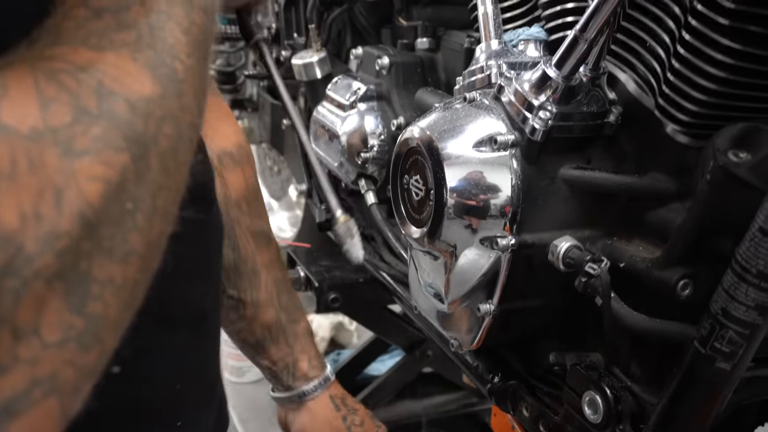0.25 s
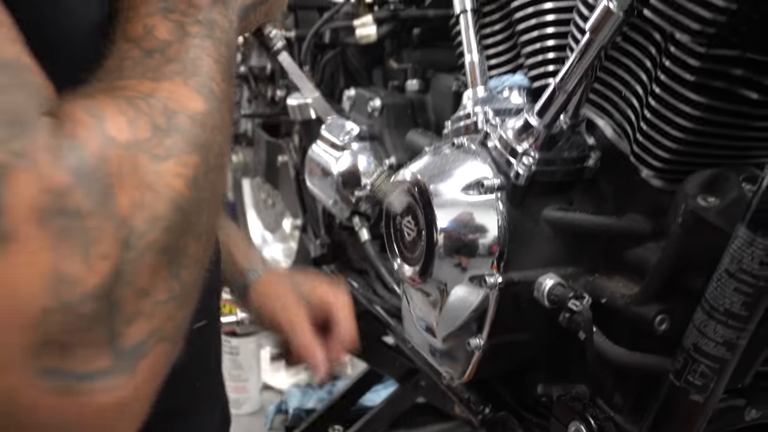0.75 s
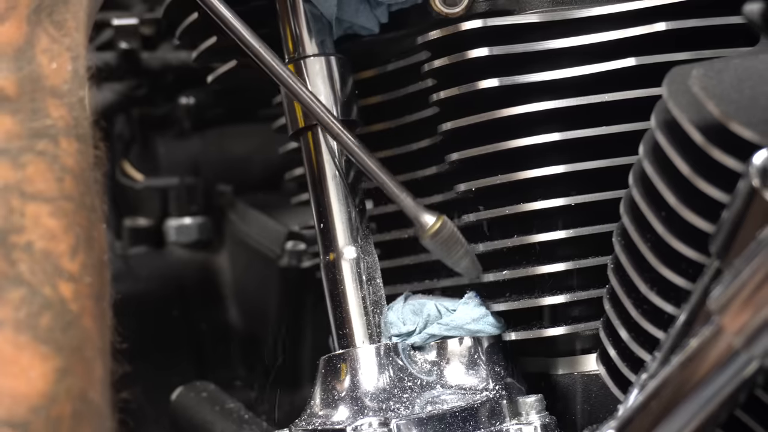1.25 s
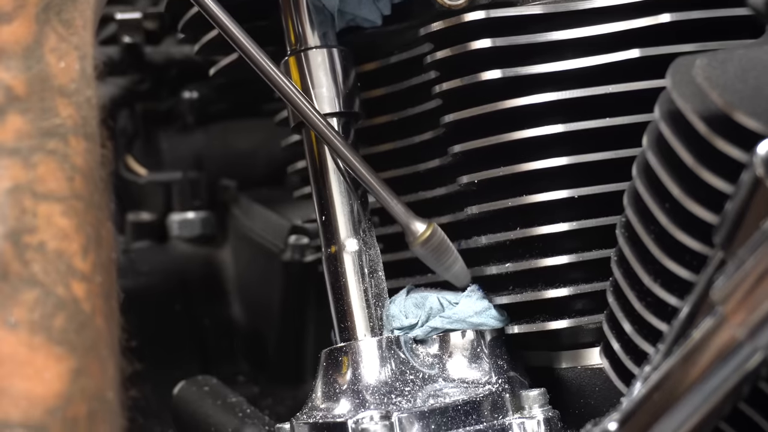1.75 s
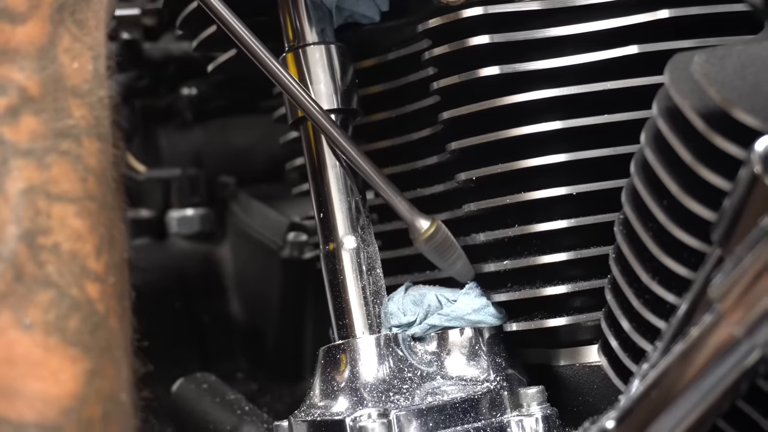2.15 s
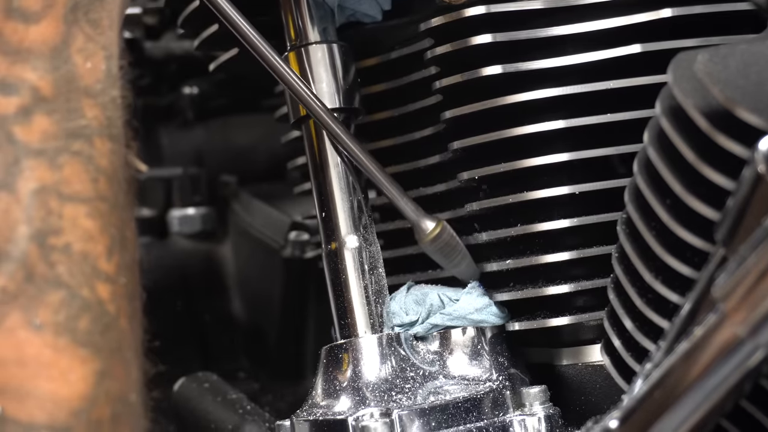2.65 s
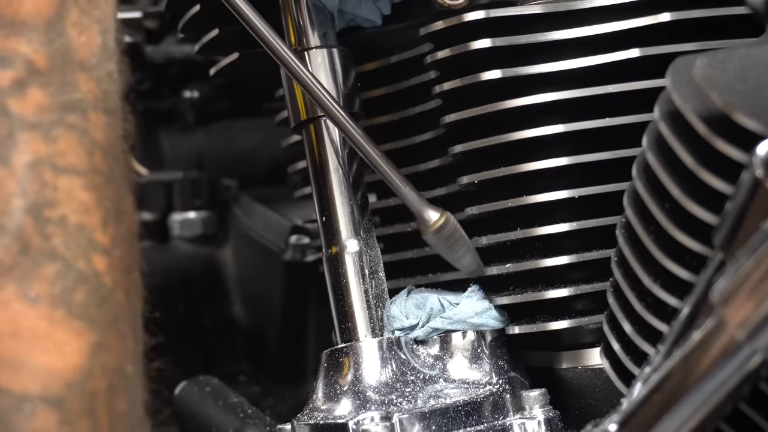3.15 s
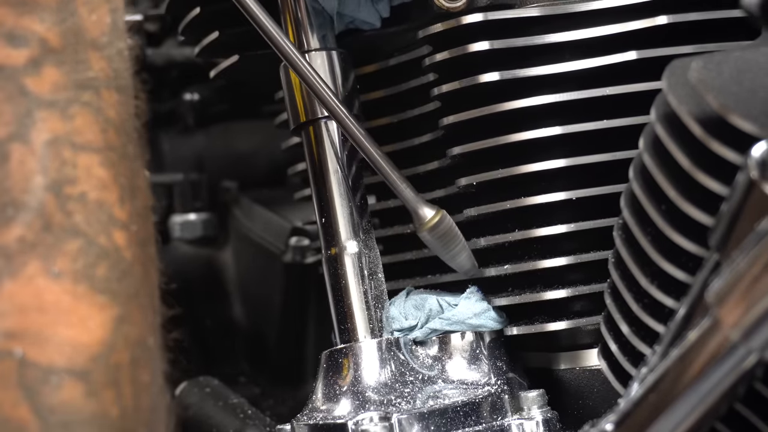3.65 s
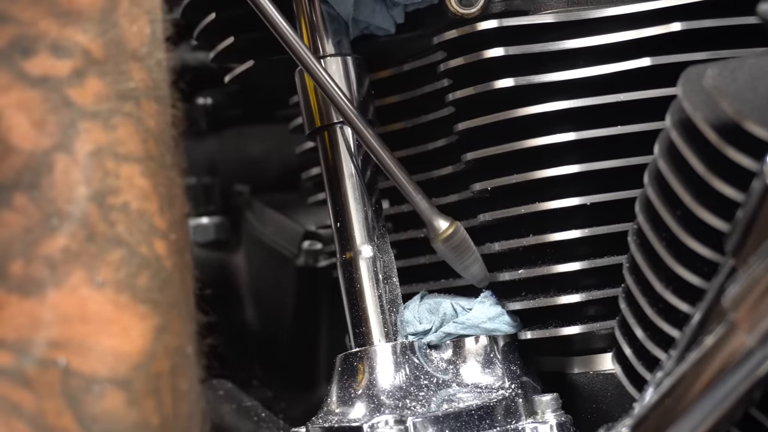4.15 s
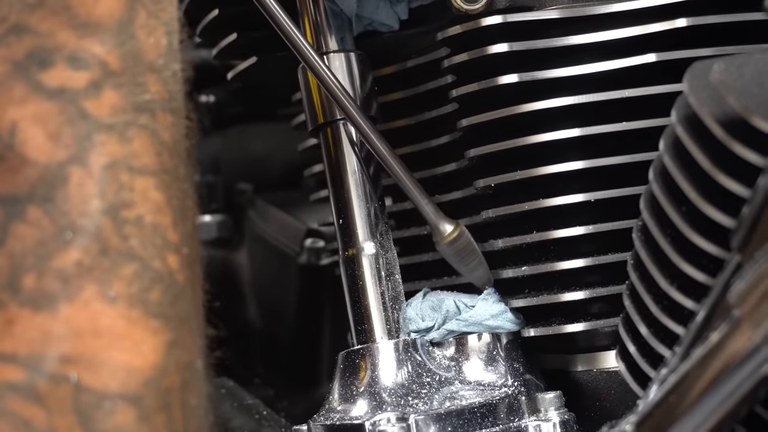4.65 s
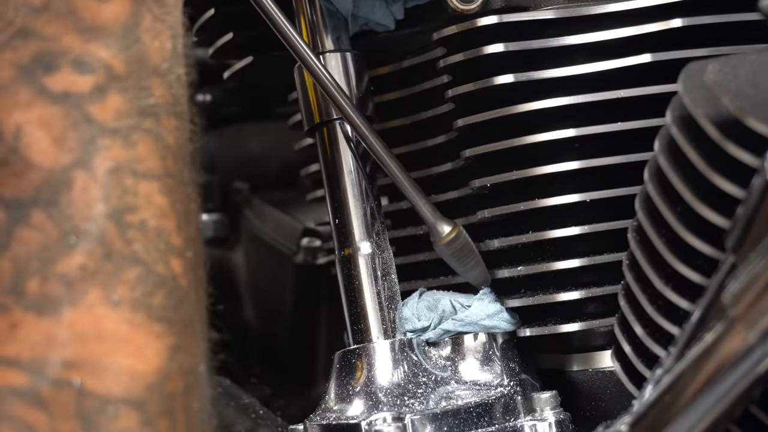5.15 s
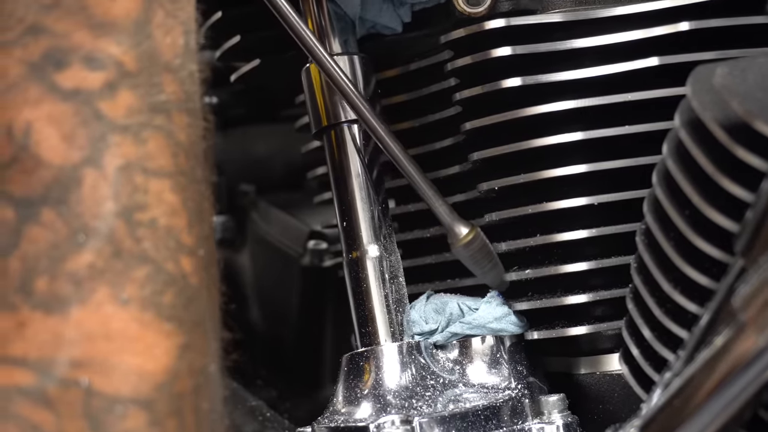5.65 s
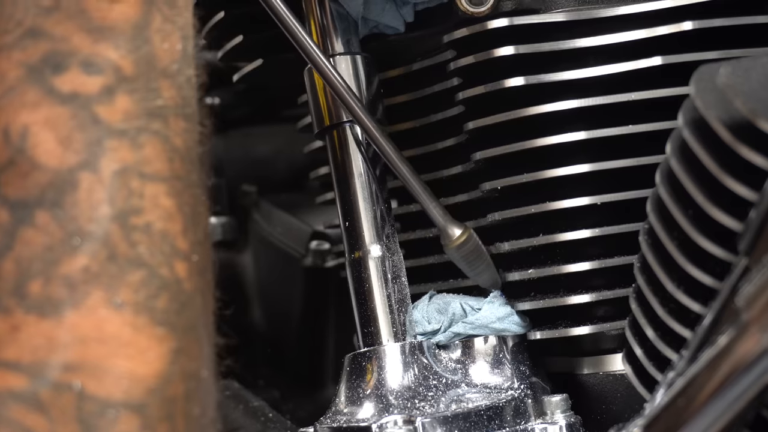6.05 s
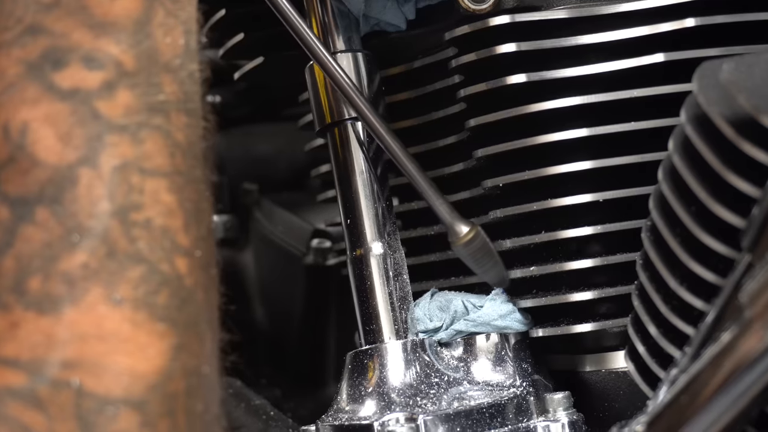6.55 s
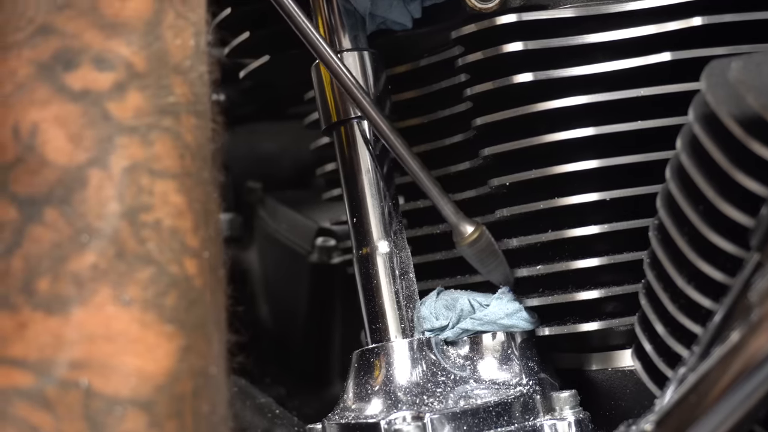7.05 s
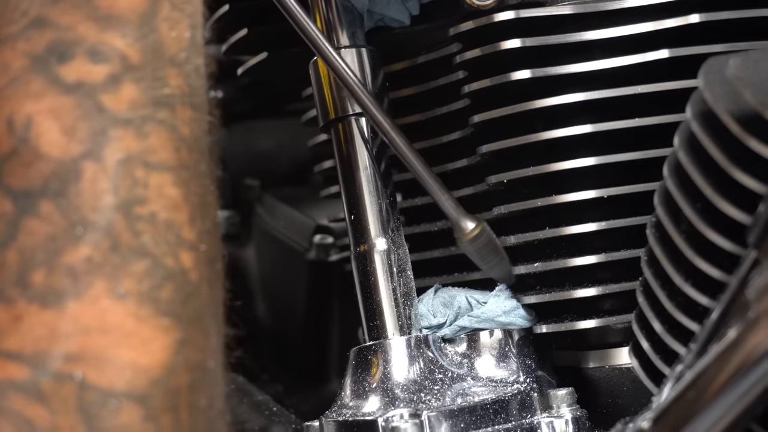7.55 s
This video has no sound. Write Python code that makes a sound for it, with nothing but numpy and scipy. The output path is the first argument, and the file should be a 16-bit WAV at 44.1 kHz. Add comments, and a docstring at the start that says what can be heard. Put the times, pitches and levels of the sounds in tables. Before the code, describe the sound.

Close and dry: a fluttering compressor drone comes first, with a soft tap, then swells just before a dull kick and air burst. An air die grinder whoops upward in a fraction of a second, dips slightly and holds a piercing whine, coloured by thin bearing tones and hiss. It runs free for several seconds, then cuts metal in two spells, adding a gritty rasp and very high brief squeaks until the end.

```python
"""An air die grinder runs up, overshoots, settles on its governor and works an engine cylinder with a burr.
One shaft speed drives the tool: sines for vanes, rotor and bearings, and shaped noise for the exhaust hiss.
Later the burr rasps and squeals: noise of chips excites resonances of the cylinder wall and the burr's shank.
Light knocks are short resonant bursts; behind them a piston compressor throbs in stroke harmonics and noise.
One close microphone."""
import sys
import numpy as np
from scipy import signal
from scipy.fft import rfft, irfft
from scipy.io import wavfile
from scipy.ndimage import uniform_filter1d

SR = 44100
rng = np.random.default_rng(int(sys.argv[2]) if len(sys.argv) > 2 else 0)


def wav_record(signal):
    """Record a signal, one row per channel, as 16-bit PCM in the file named by sys.argv[1]."""
    frames = np.transpose(np.atleast_2d(signal))
    bounded = np.clip(frames, -1, 1)
    # unit amplitude maps onto the largest positive 16-bit level
    quanta = np.round(bounded * 32767).astype(np.int16)
    wavfile.write(sys.argv[1], SR, quanta)


N = 343980
TIME = np.arange(N) / SR
FREQS = np.arange(N // 2 + 1) * SR / N

# governed speed, drifting a little while it runs: (time [s], vane-pass rate [Hz])
GOVERNED_SPEED = [(1.3, 2196), (1.73, 2188), (2.77, 2188), (2.93, 2212), (4.86, 2215), (5.59, 2209),
                  (5.98, 2226), (6.5, 2192), (7.09, 2214), (7.72, 2204)]
# strength of the vane whine before run-up losses and waver: (time [s], level [dB])
WHINE_LEVEL = [(1.3, -13), (1.46, -12.5), (2.15, -13), (2.31, -12.5), (3.53, -14), (3.81, -12.5),
               (4.85, -13), (5.55, -15.5), (7.04, -16.5), (7.2, -16.5), (7.29, -18), (7.8, -17.5)]
# resonances of the exhaust port in the run-up: (frequency [Hz], relative level [dB])
PORT_SPECTRUM = [(200, -7), (480, -11), (820, 1), (1250, -5), (1750, -10), (2650, 1), (3600, -13),
                 (4550, -5), (5500, -14), (6500, -9)]
# flow of exhaust air: (time [s], relative level [dB])
AIR_FLOW = [(1.32, -35), (2.17, -32.5), (2.4, -33), (2.71, -30), (2.87, -34), (4.17, -33.5), (5.2, -36.5),
            (5.47, -35.5), (5.88, -40.5), (6.41, -35.5), (7.8, -37.5)]
# colour of the exhaust air: (frequency [Hz], relative spectral level [dB])
EXHAUST_SPECTRUM = [(200, -57), (700, -3.5), (1300, -2.5), (2000, 1), (2700, 0), (4000, 0), (5100, 5.5),
                    (6400, -0.5), (7400, -4), (8800, 0), (10200, -8), (12800, -14.5), (15700, -16.5)]
# the hand shifts on the tool: (time [s], grip [0 = first, 1 = second])
HAND_GRIP = [(2.7, 0.071), (3.0, 1)]
# rotor and bearing lines while the tool runs:
# (multiple of shaft speed, level in first grip [dB], level in second grip [dB])
SHAFT_LINES = [(3, -25.5, -26.9), (3.552, -40.8, -44.6), (5, -39.1, -36.8), (7, -38.0, -41.0),
               (9, -30.5, -32), (10, -42.3, -41.0), (10.28, -39.1, -48.2), (11, -38.0, -37.5),
               (12, -38.7, -36.4), (13.01, -37.8, -35.3), (13.395, -33.5, -31), (14, -31.7, -31.5),
               (14.565, -38.7, -43.3), (15, -36.1, -32.9), (18, -42.5, -36.7), (18.11, -36.0, -35.8),
               (20.92, -41.7, -50.8), (21, -36.8, -48.4), (23.81, -40.0, -48.7), (24.19, -36.5, -35.5),
               (24.47, -40.2, -39.5)]
# three bearing tones that sing out: (name, base level [dB])
SINGING_TONES = [("low", -38), ("middle", -35), ("high", -41.5)]
# their places in the same sequence: (multiple of shaft speed for each tone)
SINGING_MULTIPLES = (13.815, 17.367, 31.56)
# one bearing tone swells or fades for a moment: (middle [s], length [s], change [dB], tone name)
TONE_SWELLS = [(1.31, 0.22, 10.5, "middle"), (1.52, .15, -13, "middle"), (1.61, 0.47, 11.5, "high"),
               (2.12, 0.31, 8, "middle"), (2.153, .7, 5, "high"), (2.81, .17, 12, "high"),
               (2.92, .3, -16, "middle"), (2.98, 0.46, 9, "low"), (3.22, 0.33, 10, "high"),
               (3.55, 0.46, 7, "low"), (4.27, 0.22, 7, "high"), (4.503, 3.6, 13.5, "low"),
               (4.72, 0.7, 7, "middle"), (6.7, 0.69, 5.5, "high"), (7.07, 0.43, 10.5, "middle"),
               (7.45, .12, 9, "high")]
# the burr is pressed on the wall: (start [s], length [s], rasp level [dB])
WALL_CUTS = [(5.115, .69, -30.5), (6.06, 1.8, -27)]
# hard bites that make the shank squeal: (start [s], length [s], relative level [dB])
HARD_BITES = [(5.46, 0.12, -36), (5.608, 0.057, -31), (5.746, 0.041, -34), (6.573, .125, -31),
              (6.78, 0.19, -33.5), (7.132, 0.026, -27), (7.204, 0.037, -27), (7.259, 0.047, -23),
              (7.623, .085, -30.5)]
# ringing of the burr's shank: (frequency [Hz], bandwidth [Hz], relative level [dB])
SHANK_MODES = [(7975, 16, 0), (12580, 70, -20), (14740, 110, -19)]
# cylinder wall under the burr: (frequency [Hz], bandwidth [Hz], relative level [dB])
WALL_MODES = [(1700, 74, -7), (3450, 230, -0.5), (5000, 210, -2), (6570, 87, 0), (9020, 140, -8)]
# knocks of handling, and the kick as the throttle opens: (time [s], level [dB], frequency [Hz], 60 dB decay [s])
KNOCK_EVENTS = [(.37, -36, 85, .2), (.508, -29, 1400, .12), (1.073, -16.5, 300, .1), (3.39, -34, 190, .35)]
# compressor strokes: (harmonic number, relative level at first [dB], level once the tool runs [dB])
STROKE_HARMONICS = [(1, -48, -56), (2, -48, -54), (3, -54, -59), (8, -40.5, -48.5), (9, -47, -51),
                    (11, -42, -49), (12, -43, -54), (13, -43, -44.5), (15, -40, -59), (16, -47.5, -51),
                    (17, -50, -44), (18, -37, -42), (19, -44, -48.5), (20, -44, -55), (21, -38.5, -42),
                    (22, -38, -41.5), (23, -35.5, -47), (24, -41.5, -51), (25, -49, -43.5),
                    (29, -48, -45.5), (31, -42, -47.5), (32, -59, -48.5), (33, -44, -56)]
# compressor motor: (frequency [Hz], level at first [dB], level once the tool runs [dB], waver [dB])
MOTOR_TONES = [(120, -46, -50, 1), (858.7, -34.5, -49, 1.5)]
# background level: steps up, then drops as the grinder starts: (time [s], relative level [dB])
BACKGROUND_LEVEL = [(0, -.5), (.883, .5), (.889, 8), (1.07, 9), (1.16, 6.5), (1.23, -8), (1.3, -6),
                    (7.8, -5)]
# colour of the workshop noise: (frequency [Hz], relative spectral level [dB])
WORKSHOP_SPECTRUM = [(25, -3), (100, -12.5), (180, -6.5), (350, -11), (520, -3.5), (620, -6), (800, -4),
                     (1000, -4), (1220, 0), (1900, -9.5), (3500, -6.5), (5000, -12.5), (8500, -15),
                     (11500, -32), (15500, -43)]

VANE_COUNT = 6
# the throttle is cracked, then opened fully; the rotor overshoots until the governor shuts [s]
THROTTLE_S, FULL_THROTTLE_S, GOVERNOR_S = 1.070, 1.190, 1.233
# vane passes per second at the first kick and running free; their rise at part throttle
KICK_HZ, FREE_HZ, PART_HZ_PER_S = 300, 2790, 9400
# time constants of the leap and of the settling
LEAP_S, SETTLE_S = .019, .015
# the governor hunts: rms share of the speed, and changes per second
HUNT_SHARE, HUNT_PER_S = 0.000698, 25
# the whine wavers as the tool moves: rms waver, and changes per second
WAVER_DB, WAVER_PER_S = 0.23, 20
# losses as the air pressure runs down at part throttle, and as the shutting governor chokes the whine
STARVE_DB, CHOKE_DB, CHOKE_S = 3, 15, .011
# until the rotor settles the whine takes a share of the port's colour, and a lift
PORT_SHARE, SURGE_DB = 0.58, 1
# change in hiss from spare air at part and full throttle, and the first puff
PART_AIR_DB, FULL_AIR_DB, PUFF_DB, PUFF_S = -1.5, 10.5, 4, 0.041
# the rotor and bearing lines take this share of the whine's level swings in dB
ROTOR_FOLLOWS = 0.27
SQUEAL_ATTACK_S, SQUEAL_RELEASE_S, CUT_FADE_S = .007, 0.027, 0.038
PUMP_HZ = 23.208
CUTOFF_HZ = 15750


def vane_speed():
    """Rotor inertia: a steady rise at part throttle, then exponential approaches to free and governed speed."""
    part_time = np.clip(TIME - THROTTLE_S, 0, FULL_THROTTLE_S - THROTTLE_S)
    part = KICK_HZ + PART_HZ_PER_S * part_time
    full_time = np.clip(TIME - FULL_THROTTLE_S, 0, GOVERNOR_S - FULL_THROTTLE_S)
    full = FREE_HZ + (part - FREE_HZ) * np.exp(-full_time / LEAP_S)
    governed, = in_time(GOVERNED_SPEED)
    return governed + (full - governed) * np.exp(-np.maximum(TIME - GOVERNOR_S, 0) / SETTLE_S)


def vanes(turns, speed_hz, whine_db, settled, chop_db=-2.0, rough_db=3.0, count=9):
    """Periodic chopping of air gives the whine; uneven puffs add overtones that sweep through port resonances."""
    surging, = in_time([(1.2, 1), (1.23, .5), (1.265, .5), (1.285, 0)])
    overtones = 0
    for k in range(1, count):  # multiples of half the vane-pass rate
        if k == 2:  # the whine itself
            continue
        strength = at_hz(PORT_SPECTRUM, k * speed_hz / 2) / np.sqrt(k)
        strength = strength * from_db(rough_db * drift(90))
        overtones = overtones + strength * tone(k * VANE_COUNT * turns / 2)
    sweep_db = SURGE_DB + PORT_SHARE * 20 * np.log10(at_hz(PORT_SPECTRUM, speed_hz))
    unsettled_db = (1 - settled) * (sweep_db + rough_db * drift(119.8) / 2)
    whine = from_db(unsettled_db) * tone(VANE_COUNT * turns)
    starved = np.interp(TIME, [THROTTLE_S, FULL_THROTTLE_S, FULL_THROTTLE_S + LEAP_S], [0, 1, 0])
    loss_db = STARVE_DB * starved + CHOKE_DB * swell(GOVERNOR_S, CHOKE_S)
    return from_db(whine_db - loss_db) * (whine + from_db(chop_db) * surging * overtones)


def exhaust(settled, hiss_db=8.5, gust_db=1.0, choke_db=5.0):
    """Turbulent jet noise follows the flow: a puff at first, a rush towards full throttle, then a gusty hiss."""
    full = np.clip((TIME - FULL_THROTTLE_S) / PUFF_S + 1, 0, 1)
    run_up_db = PART_AIR_DB + (FULL_AIR_DB - PART_AIR_DB) * full
    run_up_db = run_up_db + PUFF_DB * swell(THROTTLE_S + PUFF_S / 2, PUFF_S)
    air_db = in_time(AIR_FLOW)[0] + (1 - settled) * run_up_db - choke_db * swell(GOVERNOR_S, PUFF_S)
    jet = rng.standard_normal(N) * from_db(gust_db * drift(60))
    return from_db(air_db + hiss_db) * coloured(jet, EXHAUST_SPECTRUM)


def rotor(turns, waver_db=1.0, flutter_db=1.0, rattle_db=-12.0, wander_db=1.5):
    """Shaft orders stay phase-locked and bearing tones slip; all waver as the tool moves in its own echoes."""
    grip, = in_time(HAND_GRIP)
    slip = 0.0022 * drift(25)  # turns
    out = 0
    for order, first_db, second_db in SHAFT_LINES:
        on_shaft = abs(order - round(order)) < .05
        line = tone(round(order) * turns) if on_shaft else tone(order * (turns + slip))
        waver = min(order / 10, 1) * (waver_db * drift(4) + flutter_db * drift(35))
        grip_db = first_db + (second_db - first_db) * grip
        out = out + from_db(grip_db + waver) * line
    for order, (name, base_db) in zip(SINGING_MULTIPLES, SINGING_TONES):
        swells_db = sum(change_db * swell(s, length) for s, length, change_db, which in TONE_SWELLS
                        if which == name)
        db = base_db + swells_db + wander_db * drift(5)
        clean = tone(order * (turns + slip))
        rattle = drift(220) * tone(order * turns)  # uneven balls smear each line
        out = out + from_db(db + flutter_db * drift(25)) * (clean + from_db(rattle_db) * rattle)
    return out


def bearing_buzz(turns, buzz_db=-31.0, rise_db=11.0, count=43):
    """Modulation by the ball cage sets sidebands about each shaft order; a tilt in level favours the treble."""
    out = 0
    for k in range(4, count):
        for cage in (-.395, 0, .395):
            line_hz = (k + cage) * 368  # near the governed shaft rate
            strength = at_hz(EXHAUST_SPECTRUM, line_hz) * from_db(rng.uniform(-6, 6))
            out = out + strength * from_db(rise_db * k / count) * tone((k + cage) * turns)
    return from_db(buzz_db) * rms_one(out)


def burr(turns, squeal_db=4.5, light_db=-42.0):
    """Chip noise pulsing once a turn excites wall modes; the shank rings in a cut and squeals at a hard bite."""
    cuts = [(held(s, length, CUT_FADE_S, CUT_FADE_S / 2), db) for s, length, db in WALL_CUTS]
    rasp = sum(from_db(db) * touch for touch, db in cuts)
    ringing = from_db(light_db) * sum(touch for touch, db in cuts)
    for s, length, db in HARD_BITES:
        bite = from_db(db) * held(s, length, SQUEAL_ATTACK_S, SQUEAL_RELEASE_S)
        ringing = np.maximum(ringing, bite)
    chips = rng.standard_normal(N) * from_db(1.5 * drift(300) + 3 * np.cos(2 * np.pi * turns))
    squeal = 0
    for hz, width, db in SHANK_MODES:
        swing = resonate(resonate(chips, hz, width), hz, 10 * width)
        # friction holds each swing steady
        swing = swing / np.sqrt(uniform_filter1d(swing ** 2, int(.04 * SR)) + 1e-6)
        squeal = squeal + from_db(db) * swing
    return from_db(squeal_db) * ringing * squeal + rasp * body(chips, WALL_MODES)


def knocks():
    """Impact excitation: bursts of noise in one broad resonance, each decaying exponentially."""
    out = 0
    for s, db, hz, decay in KNOCK_EVENTS:
        fade = (TIME >= s) * from_db(-60 * np.clip((TIME - s) / decay, 0, 2))
        bump = resonate(resonate(rng.standard_normal(N), hz, hz), hz, hz)
        out = out + from_db(db) * fade * bump
    return out


def compressor(noise_db=-25.5, repeat_share=0.57, throb_db=0.5, valve_db=-38.0, valve_width_hz=70, boom_db=-44.0):
    """Periodic strokes give a harmonic series and repeated clatter, with fresh hiss, a ringing valve and a boom."""
    strokes = TIME * PUMP_HZ - .86
    later = np.clip(TIME - 1, 0, .2) / .2
    level = from_db(in_time(BACKGROUND_LEVEL)[0])
    drone = 0
    for k, first_db, later_db in STROKE_HARMONICS:
        height = from_db(first_db) * level * (1 - later) + from_db(later_db) * later
        # the room delays each harmonic in its own way, the lows most [rad]
        lag = 1.05 * rng.standard_normal() + 9 * np.exp(-k / 8)
        drone = drone - np.sqrt(2) * height * np.cos(2 * np.pi * k * strokes + lag)
    for hz, first_db, later_db, waver_db in MOTOR_TONES:
        motor_db = first_db + (later_db - first_db) * later + waver_db * drift(4.9)
        drone = drone + from_db(motor_db) * tone(hz * TIME)
    clatter = np.resize(rng.standard_normal(round(SR / PUMP_HZ)), N)  # the same noise every stroke
    rush = np.sqrt(repeat_share) * clatter + np.sqrt(1 - repeat_share) * rng.standard_normal(N)
    throb = from_db(throb_db * np.cos(2 * np.pi * (strokes + 0.54)))
    rush = coloured(rush * throb, WORKSHOP_SPECTRUM)
    # one impulse a stroke, of uneven strength
    slaps = np.diff(np.floor(strokes + .58), prepend=-1) * (1 + .25 * rng.standard_normal(N)) + 1e-9
    valve = resonate(resonate(slaps, 3460, valve_width_hz), 3460, 2 * valve_width_hz)
    boom = resonate(rng.standard_normal(N), 416.6, 8)  # wavers near the 18th stroke harmonic
    return drone + from_db(boom_db) * boom + level * (from_db(noise_db) * rush + from_db(valve_db) * valve)


def from_db(db):
    """Logarithmic level: decibels to amplitude gain."""
    return 10 ** (np.asarray(db) / 20)


def rms_one(x):
    """Normalisation of the mean power: rms 1."""
    return x / np.sqrt(np.mean(x ** 2) + 1e-20)


def in_time(rows):
    """Linear interpolation in time: one curve per column."""
    s, *columns = np.transpose(rows)
    return [np.interp(TIME, s, c) for c in columns]


def at_hz(points, hz):
    """Gain of a spectrum, interpolated in decibels over logarithmic frequency."""
    f, db = np.transpose(points)
    return from_db(np.interp(np.log(hz + 1), np.log(f), db))


def coloured(x, spectrum):
    """Spectral shaping of noise by a Fourier product; rms 1."""
    return rms_one(irfft(rfft(x) * at_hz(spectrum, FREQS), N))


def drift(rate):
    """Band-limited random modulation: smoothed random knots at a rate per second; rms 1."""
    knots = rng.standard_normal(4000)
    curve = np.interp(TIME * rate, np.arange(len(knots)), knots)
    return rms_one(uniform_filter1d(curve, int(SR / rate / 2) + 1))


def resonate(x, hz, width_hz):
    """A damped oscillator as a two-pole resonance; rms 1."""
    r = np.exp(-np.pi * width_hz / SR)
    return rms_one(signal.lfilter([1, 0, -1], [1, -2 * r * np.cos(2 * np.pi * hz / SR), r * r], x))


def body(x, modes):
    """Modal superposition: parallel resonances of alternating sign; rms 1."""
    return rms_one(sum((-1) ** k * from_db(db) * resonate(x, hz, width)
                       for k, (hz, width, db) in enumerate(modes)))


def tone(turns):
    """Simple harmonic motion from a random phase; rms 1 over whole cycles."""
    return np.sqrt(2) * np.sin((2 * np.pi * ((turns + rng.random()) % 1)).astype(np.float32))


def swell(s, length):
    """Gaussian envelope of height 1 around s, falling to 1/e half a length away."""
    return np.exp(-(2 * (TIME - s) / length) ** 2)


def held(s, length, attack, release):
    """Linear attack, hold and exponential decay."""
    return np.clip((TIME - s) / attack, 0, 1) * np.exp(-np.clip((TIME - s - length) / release, 0, 30))


def scene():
    """Superposition: one shaft phase drives the tool, the background adds, and both channels hear the same."""
    speed_hz = vane_speed()
    whine_db = in_time(WHINE_LEVEL)[0] + WAVER_DB * drift(WAVER_PER_S)
    hunting_hz = speed_hz * (1 + HUNT_SHARE * drift(HUNT_PER_S))
    turns = np.cumsum(hunting_hz) / SR / VANE_COUNT
    opened = np.clip((TIME - THROTTLE_S) / .006, 0, 1)
    settled, = in_time([(1.245, 0), (1.285, 1)])
    air = vanes(turns, speed_hz, whine_db, settled) + exhaust(settled)
    follow = from_db(ROTOR_FOLLOWS * (whine_db - whine_db.mean()))
    lines = follow * (rotor(turns) + bearing_buzz(turns))
    tool = opened * air + settled * lines + burr(turns)
    return np.tile(tool + compressor() + knocks(), (2, 1))


def record(dry):
    """Soft saturation rounds the highest peaks; an elliptic low-pass cuts the top steeply."""
    rounded = dry / (1 + (dry / .95) ** 8) ** (1 / 8)
    return signal.sosfilt(signal.ellip(12, .1, 90, CUTOFF_HZ, fs=SR, output="sos"), rounded)


dry = scene()
out = record(dry)
wav_record(out)
```